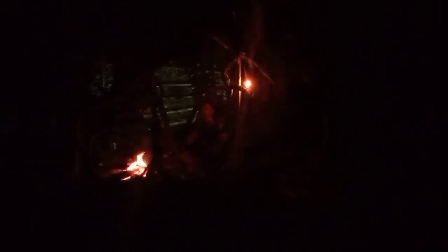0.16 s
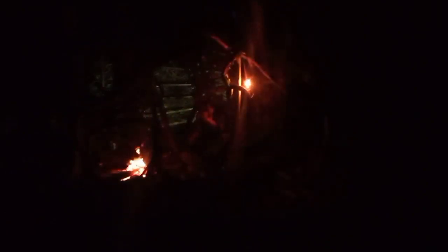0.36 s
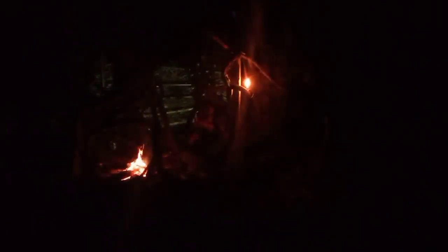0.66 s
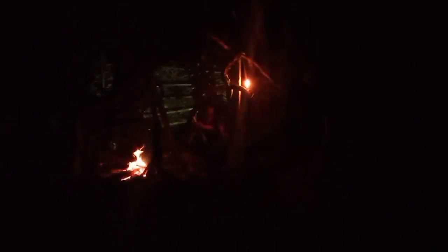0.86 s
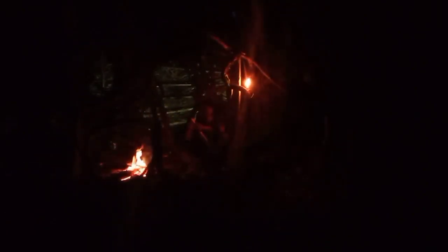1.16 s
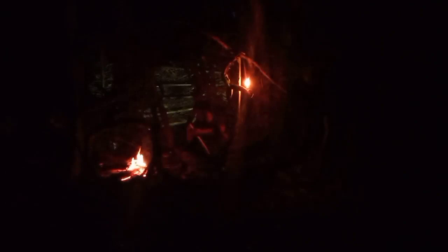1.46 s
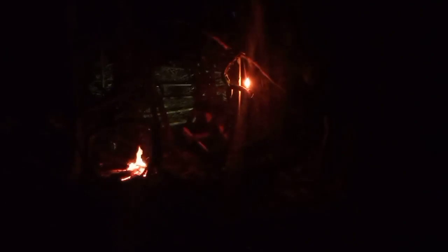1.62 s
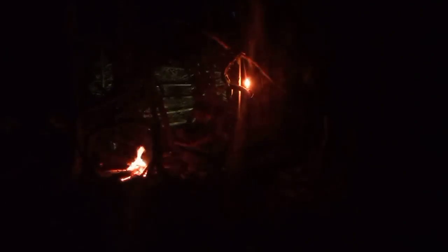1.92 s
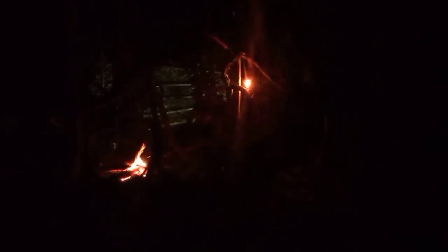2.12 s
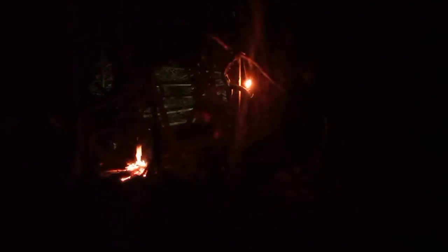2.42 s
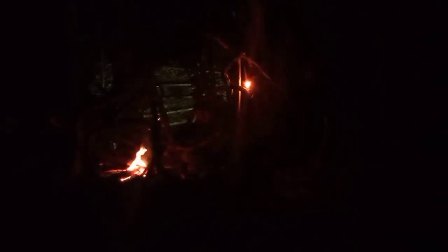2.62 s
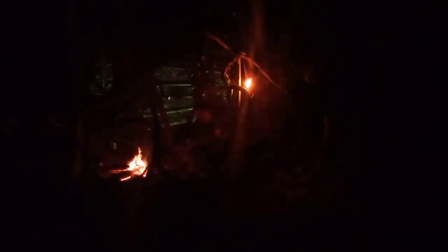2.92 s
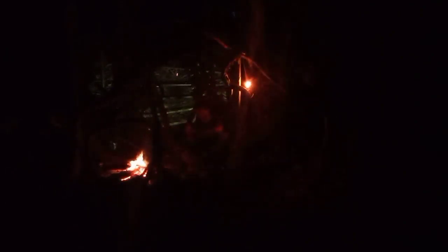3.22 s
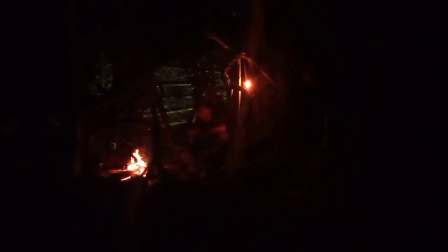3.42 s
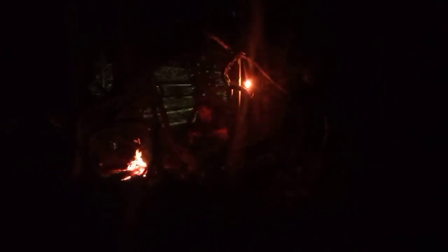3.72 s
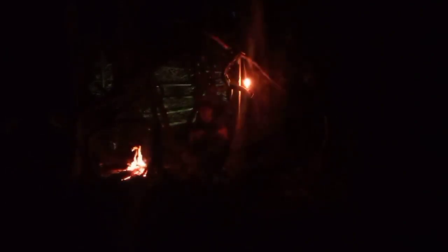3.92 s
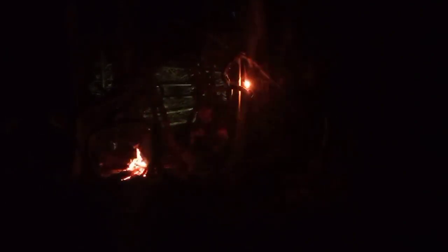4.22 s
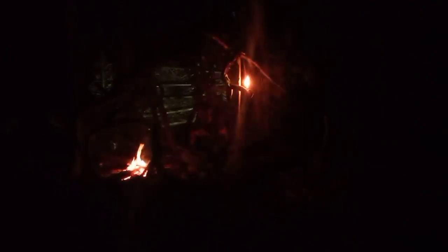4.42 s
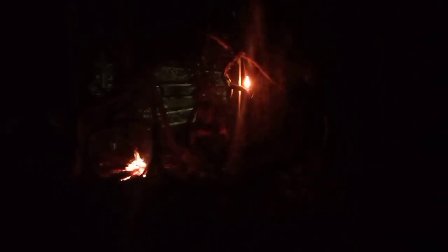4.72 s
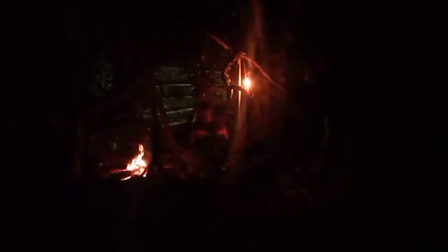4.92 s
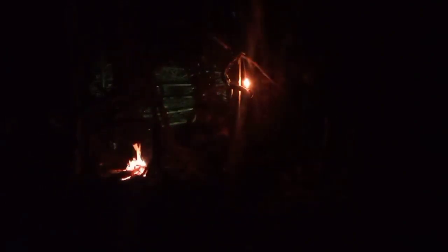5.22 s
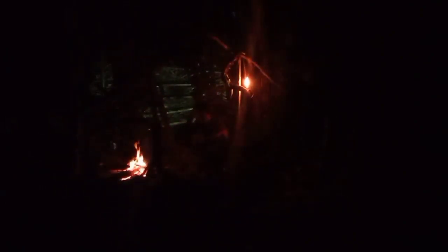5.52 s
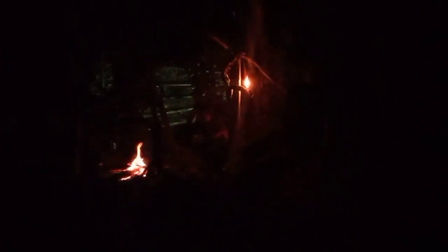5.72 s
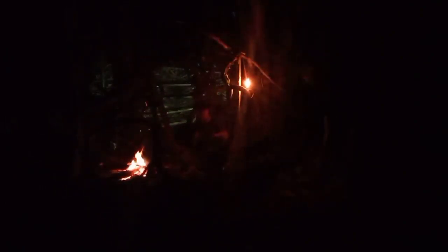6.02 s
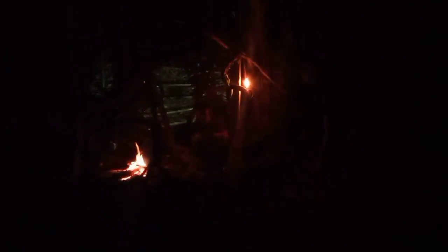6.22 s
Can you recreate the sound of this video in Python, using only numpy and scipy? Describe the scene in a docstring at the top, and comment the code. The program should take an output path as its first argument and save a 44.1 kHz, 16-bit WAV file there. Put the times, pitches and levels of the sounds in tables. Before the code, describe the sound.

A rainforest camp at night, in wide stereo with scattered tree echoes. Cricket choirs trill throughout between 6 and 8 kHz, the lower to the left, the higher to the right, over soft hiss and a distant throbbing chorus. A nearby central cricket gives five-stroke falling chirps about every 0.6 s. From 0 to 2 s the background rises and dips abruptly; katydids rasp very high, mostly left, with a cluster of hard wing snaps at 1.6-1.8 s. At 2.2 s a dense, bright 10-15 kHz buzz swells in quickly; its broader part stops at 4.7 s, the narrower at 6.2 s. Faint frog peeps come around 1.1-1.4, 2.1, 2.5, 4.65, 5.4 and 5.9 s. Dry rustles gather at 3.4-5 s. A small fire flutters and puffs very low, with small cracks at 0.9 and 3.7 s, the sharpest at 4.2-4.3 s left, woodier ones at 4.5 s and a faint one at 5.7 s.

```python
"""Rainforest camp at night

Choirs of crickets trill between 6 and 8 kHz over a far chorus, and one chirps close by: trains of short pure notes.
Katydids rasp very high, mostly on the left, and two other kinds set in with a long buzz, ending one after
the other: clicking file teeth that ring a wing. A small campfire flutters and cracks in shaped noise, a frog
peeps as a wavering tone, something rustles in a spray of ticks, and the trees scatter nearly every sound."""
import sys
import numpy as np
from scipy import signal
from scipy.fft import rfft, irfft, next_fast_len
from scipy.io import wavfile

SR = 44100
rng = np.random.default_rng(int(sys.argv[2]) if len(sys.argv) > 2 else 0)


def to_wav(sig):
    """Store sig (one row per channel, or 1-D mono) as 16-bit WAV at the path in sys.argv[1].

    Samples outside -1..1 are clipped; the rate is SR.
    """
    pcm = np.clip(np.atleast_2d(sig), -1, 1) * 32767
    pcm = np.round(pcm).astype(np.int16)
    wavfile.write(sys.argv[1], SR, pcm.T)  # frames by channels


N = 280476
TIME = np.arange(N) / SR

# In every table and setting, a positive pan_db leans left.
# Levels of the background sounds are those before its common rise and fall.
# common rise and fall of the whole background: start_s, level_db
BACKGROUND_LEVEL = [(0, -8.5), (.78, -8), (.83, -0.5), (.88, 2), (.91, -5.5), (1.06, -6.5), (1.11, 0.5),
                    (1.2, -3.5), (1.3, -1.5), (1.43, -7.5), (1.53, -1), (1.86, 1), (1.91, -4.5),
                    (2.03, -5.5), (2.09, -3.5), (2.16, -7.5), (2.47, -7.5), (2.53, -0.5), (6.13, 0.5),
                    (6.19, -4.5), (6.36, -3.5)]

# single crickets, levels relative within each group: wing_pitch_hz, strokes_per_s, level_db
LOW_SINGERS = [(6030, 65, -12), (6160, 41, -1), (6190, 58, -3), (6225, 47, -2), (6185, 67, -3),
               (6190, 83, 1)]
GUEST_SINGER = [(6045, 40, 0)]
MIDDLE_SINGERS = [(6440, 23, 0.5), (6790, 47, 4), (7040, 74, -6), (7170, 82, -4), (7300, 47, 6)]
HIGH_SINGERS = [(7310, 46, -1), (7524, 51, -3.5), (7630, 57, -4.5), (7744, 36, 1.5), (7865, 69, -0.5),
                (8230, 62, -11)]
TRILLERS = [(7480, 95, 3), (7790, 80, -7.5)]
TREE_SINGERS = [(2290, 41, 1.5), (3070, 52, -10)]

# unbroken wing tones, relative levels: pitch_hz, level_db
LOW_TONES = [(6143, 0), (6262, 0)]
BROAD_TONES = [(10078, -6), (10490, -4), (10648, -1), (10810, -4), (11311, -3), (12345, -1), (12490, -2)]
NARROW_TONES = [(11656, -0.84), (11775, 0.2), (11923, 0.2), (12069, -2.2), (12283, -1)]
LOW_TONES_DB, BROAD_TONES_DB, NARROW_TONES_DB = -7.5, -10, -8.5

LOW_CHOIR_DB, LOW_CHOIR_PAN_DB = -53.5, 4.5
GUEST_MIDDLE_S, GUEST_LENGTH_S, GUEST_DB = 1.24, 0.6, -52.5

# level of the middle choir over time: start_s, level_db
MIDDLE_LEVEL = [(0, -59), (1.1, -68.5), (2.3, -65), (2.65, -53.5), (3.05, -61), (3.6, -59), (4.7, -50.5),
                (5.3, -60), (6.36, -57.5)]
# moments when the middle choir stands out: middle_s, length_s, level_db
MIDDLE_CHIRPS = [(1.36, 0.072, -54.5), (1.616, 0.17, -54), (3.137, 0.063, -55), (3.557, 0.2, -47.5),
                 (3.742, 0.1, -47.5), (4.323, 0.11, -49.5), (4.517, 0.046, -46), (4.81, 0.12, -49),
                 (5.08, 0.12, -51), (5.665, 0.082, -48.5), (5.85, 0.19, -55), (6.36, 0.032, -49)]
MIDDLE_LOW_HZ, MIDDLE_HIGH_HZ = 6550, 7400

# level of the high choir over time: start_s, level_db
HIGH_LEVEL = [(0, -57.5), (1.2, -54.5), (2.35, -56), (2.6, -52.5), (4, -54.5), (4.8, -51), (5.35, -56),
              (5.8, -53), (6.36, -58)]
HIGH_CHOIR_PAN_DB = -5
TRILLER_DB, TRILLER_PAN_DB = -63.5, -8.5

# level of the low chirr over time: start_s, level_db
CHIRR_LEVEL = [(0, -76), (2.4, -76), (2.6, -66), (3.1, -71), (3.58, -62), (3.85, -70), (4.3, -60),
               (4.55, -61), (4.9, -67), (5.4, -70), (5.8, -65), (6.36, -72)]
CHIRR_LOW_HZ, CHIRR_HIGH_HZ = 3450, 4500

# spectra of the air hiss and the far chorus: frequency_hz, relative_level_db (per Hz)
AIR_COLOUR = [(100, -1.5), (180, 7), (400, 4), (1000, 0), (1500, 0), (2000, 1), (3800, 0), (4700, -2),
              (5400, -7.5), (8300, -19), (9200, -18), (15000, 2)]
CHORUS_COLOUR = [(1700, -15), (2100, 1), (2290, 3.5), (2420, 4.5), (2700, 3.5), (2900, 4.5), (3140, 10),
                 (3260, -10), (4000, -35.5)]
AIR_DB, CHORUS_DB = -60, -62
FAR_CALL_LOW_HZ, FAR_CALL_HIGH_HZ = 2150, 3200

# spectra of the flutter and of the deep part of a puff: frequency_hz, relative_level_db (per Hz)
FLAME_COLOUR = [(25, -28), (55, -3.5), (90, 1), (130, -2.5), (180, -14), (350, -28)]
PUFF_COLOUR = [(18, 13), (50, -7), (75, 14), (110, -39)]
FLAME_DB = -71
PUFF_DEPTH_DB = -4.5  # deep part against upper part

# rasps of the high katydids: middle_s, length_s, level_db, pan_db
RASPS = [(0.272, 0.41, -64.5, 15), (.55, .06, -62, 10), (0.829, 0.08, -48.5, 14), (0.998, 0.13, -58.5, 14),
         (1.104, 0.05, -41, 13), (1.183, 0.11, -57.5, 14), (1.278, 0.086, -52.5, 18),
         (1.523, 0.077, -61, 20), (1.648, 0.12, -47, -2), (1.782, 0.17, -45.5, 1), (2.07, 0.07, -47, 4),
         (2.862, 0.077, -42, 13), (3.807, .06, -43, 14), (4.694, .06, -47, 16), (4.784, 0.095, -44, 23),
         (4.855, .04, -47, 20), (5.168, 0.094, -53, 14), (5.354, .07, -55, 15), (5.538, 0.23, -52, 20),
         (5.717, 0.12, -72, 12), (5.997, 0.37, -58, 14), (6.34, 0.19, -54.5, 9)]
# hard wing snaps, peak levels before the low cut: start_s, level_db, pan_db
WING_SNAPS = [(1.616, -36, -8), (1.657, -35, 10), (1.695, -33, -1), (1.719, -25.5, 14), (1.730, -31, 7),
              (1.737, -31, 5), (1.749, -33, -4), (1.783, -25, 12), (1.814, -29.5, 12), (2.853, -32, 9),
              (4.765, -31, 14), (4.778, -32, 14), (5.531, -28, 18)]
# katydid wing resonances: frequency_hz, relative_level_db (per Hz)
RASP_WING = [(9500, -54), (11000, -23), (12000, -14), (13800, -6.5), (14600, -2), (15100, 0), (15500, -8)]
BROAD_WING = [(8700, -60), (9200, -11), (10000, -4), (10550, 1), (10950, -1.5), (11300, -0.5), (11700, 0.5),
              (12350, 3), (12900, -1.5), (14200, -3), (15500, -4)]
NARROW_WING = [(9000, -27), (10000, -16), (10450, -2.5), (10800, -3.5), (11100, -3), (11380, -7),
               (11750, 1), (12050, -2.5), (12300, -4), (12650, -5), (13100, -9.5), (14200, -12.5),
               (15500, -14)]
SIZZLE_DB, SIZZLE_PAN_DB = -62, 19

# chirps of one near cricket, before the offset of each stroke: start_s, level_db
CHIRPS = [(.079, -41), (.698, -44), (1.259, -38), (1.863, -39.5), (2.487, -43.5), (3.078, -36),
          (3.683, -38.5), (4.296, -39), (4.912, -40), (5.494, -45), (6.128, -44)]
# wing strokes of one chirp, in order: level_db
CHIRP_STROKES = [-12.5, -12, -3, -3.5, -3.5]
CHIRP_STEP_S, CHIRP_STROKE_S = .032, .018
CHIRP_TOP_HZ, CHIRP_FALL_HZ, CHIRPER_PAN_DB = 8060, 700, 1

# rustles in the litter: middle_s, length_s, level_db, crispness (0-1)
RUSTLES = [(0.491, 0.087, -67, 0.8), (2.62, 0.2, -60, .9), (3.45, 0.16, -62, 0.8),
           (3.595, 0.075, -57.5, 0.72), (3.93, 0.55, -62, 0.4), (4.32, 0.18, -56, 0.6),
           (4.514, 0.068, -55, 0.55), (4.723, 0.2, -57, 0.6), (5.01, 0.29, -59.5, 0.5),
           (5.814, 0.12, -61, 0.8)]
# spectrum of the litter ticks: frequency_hz, relative_level_db (per Hz)
RUSTLE_COLOUR = [(600, -5), (1100, 1), (1500, 9), (2100, 5), (3200, 3), (4100, 5), (5200, -6), (7000, -10),
                 (10000, -10)]
RUSTLE_SPLIT_HZ = 2950

# puffs of the flames: middle_s, length_s, level_db, pan_db
PUFFS = [(.6, 0.044, -74, -5), (0.845, 0.028, -63.5, 4), (0.99, 0.089, -67, 8), (1.314, 0.065, -68, 3),
         (1.438, 0.12, -67.5, 1), (1.87, 0.13, -67.5, -6), (2.212, 0.057, -74.5, -7),
         (2.438, 0.1, -66.5, -17), (2.544, 0.051, -61.5, -19), (2.724, 0.03, -61, -17),
         (2.816, 0.027, -63, -17), (3.022, 0.023, -56.5, -17), (3.282, 0.04, -63.5, 1),
         (3.674, 0.11, -63, 1), (3.844, 0.1, -63.5, 21), (4.108, 0.062, -66, 2), (4.221, 0.032, -61.5, -10),
         (4.821, 0.04, -67.5, -1), (4.97, 0.14, -62, 10), (5.175, 0.069, -64, 1),
         (5.566, 0.042, -65.5, -10), (5.695, 0.091, -68, 0)]
# cracks of the wood, before the fire's mix: start_s, level_db, ring_hz, ring_t60_s, pan_db
CRACKS = [(0.884, -52, 6500, 0.01, 5), (3.708, -50.5, 1760, 0.019, -1), (4.214, -42, 12400, .008, 16),
          (4.286, -30, 12500, .015, 20), (4.336, -53, 1510, 0.1, 8), (4.503, -51, 3930, 0.06, 10),
          (4.521, -46.5, 3880, 0.08, 9), (5.698, -58, 7000, 0.024, 4)]
TICK_DB = -8  # sharp tick against the ring

# frog peeps: middle_s, level_db, pan_db
PEEPS = [(1.115, -67, 3), (1.28, -65, 9), (1.36, -67, -1), (2.095, -60, 7), (2.53, -63, 9), (4.65, -56, 18),
         (5.42, -55.5, 11), (5.89, -56, 0)]
PEEP_HZ = 2283

# both kinds of the long buzz set in together and end one after the other
BUZZ_START_S, BROAD_END_S, NARROW_END_S = 2.175, 4.73, 6.21
BROAD_ATTACK_S, BROAD_RELEASE_S, BROAD_DB, BROAD_PAN_DB = 0.22, 0.2, -40.5, 0.5
NARROW_ATTACK_S, NARROW_RELEASE_S, NARROW_DB, NARROW_PAN_DB = 2.56, 0.26, -43.5, 2
# it spreads out from its core as it starts and shrinks back as it stops
BUZZ_CORE_HZ, BUZZ_WIDENS_S, BUZZ_NARROWS_S = 11600, 0.53, 0.15

# pips of another cricket: middle_s, pitch_hz, level_db
PIPS = [(2.216, 6600, -50), (2.68, 6730, -46), (2.93, 6500, -60), (3.55, 6740, -56), (4.2, 6740, -58),
        (4.41, 6750, -50), (4.63, 6680, -54), (4.85, 6860, -54), (5.3, 6740, -54), (5.49, 6770, -52),
        (6.13, 6720, -45)]
PIP_LENGTH_S = 0.045

CUTOFF_HZ = 15450


def from_db(db):
    """Decibels to gain."""
    return 10 ** (np.asarray(db) / 20)


def rms_one(x):
    """Scale to unit rms, each channel alone."""
    return x / np.sqrt(np.mean(x ** 2, axis=-1, keepdims=True) + 1e-20)


def in_time(rows):
    """The columns of a curve at every sample."""
    s, *columns = np.transpose(rows)
    return [np.interp(TIME, s, c) for c in columns]


def drift(rate):
    """Slow random wandering of rms 1, mostly below the rate in Hz."""
    step = 40  # samples between the points of the slow curve
    hz = np.fft.rfftfreq(N // step, step / SR)
    slow = irfft(rfft(rng.standard_normal(N // step)) / (1 + (hz / rate) ** 2))
    return np.interp(np.arange(N) / step, np.arange(len(slow)), rms_one(slow))


def sway(rate, depth_db):
    """Gains of many unrelated singers coming and going, different in each ear."""
    return from_db(depth_db * np.array([drift(rate), drift(rate)]))


def swell(s, length):
    """A flat-topped hump around s, 6 dB down at the ends of its length."""
    return 1 / (1 + np.square(np.square(2 * (TIME - s) / length)))


def panned(pan_db):
    """Left and right gains of constant total power."""
    gains = from_db(np.array([[.5], [-.5]]) * pan_db)
    return gains / np.sqrt(np.mean(gains ** 2, axis=0))


def colour(x, points):
    """Give a steady sound a spectrum that falls 60 dB per octave beyond its ends; rms 1."""
    size = next_fast_len(N, real=True)
    octave = np.log2(np.fft.rfftfreq(size, 1 / SR) + 1)
    hz, db = np.transpose(points)
    knots = np.log2(hz)
    beyond = np.abs(octave - np.clip(octave, knots[0], knots[-1]))
    gain = from_db(np.interp(octave, knots, db) - 60 * beyond)
    return rms_one(irfft(rfft(x, size) * gain, size)[..., :N])


def diffuse(points, alike):
    """Stereo noise from all round, partly alike in both ears."""
    mid, side = rng.standard_normal((2, N))
    alike = np.clip(alike, 0, 1)
    both = np.sqrt(1 + alike) * mid + np.sqrt(1 - alike) * side * [[1], [-1]]
    return colour(both, points)


def forest(x, t60, direct_db):
    """The straight path plus countless small echoes from trunks and leaves, unrelated in the two ears."""
    t = TIME[:SR // 2]
    echoes = rng.standard_normal((2, len(t))) * from_db(-60 * t / t60)
    paths = rms_one(echoes) / np.sqrt(len(t))
    # the straight path reaches each ear within the first 16 samples
    paths[[0, 1], rng.integers(0, 16, size=2)] += from_db(direct_db)
    paths = paths / np.sqrt(1 + from_db(direct_db) ** 2)
    return signal.oaconvolve(x[None], paths, axes=1)[:, :N]


def stroke_phase(per_s, unsteady):
    """Place within the wing stroke, 0-1, at a slightly unsteady rate."""
    return (rng.random() + np.cumsum(per_s * (1 + unsteady * drift(3))) / SR) % 1


def crickets(singers, glide, waver, throb_db, t60, direct_db):
    """Each wing stroke is a short pure note, begun afresh, that sags in pitch as the file slows."""
    out = 0
    for hz, per_s, db in singers:
        phase = stroke_phase(per_s, unsteady=.09)
        stroke_number = np.cumsum(np.diff(phase, prepend=0) < 0)
        fresh = rng.random(2000)[stroke_number]  # a new starting phase for each stroke
        pitch = hz * (1 + glide * (.5 - phase) + waver * drift(222.5))
        tone = np.sin(2 * np.pi * (np.cumsum(pitch) / SR + fresh))
        note = np.sin(np.pi * phase) ** 4 * tone
        throbbing = note * from_db(throb_db * drift(25.5))
        out = out + from_db(db) * rms_one(forest(throbbing, t60, direct_db))
    return rms_one(out)


def whistles(tones, waver_hz, throb_db):
    """Singers whose wings ring on without a break: thin, wavering tones among the trees."""
    voices = 0
    for hz, db in tones:
        gain = from_db(db + throb_db * drift(3.1))
        voices = voices + gain * np.sin(2 * np.pi * np.cumsum(hz + waver_hz * drift(28.7)) / SR)
    return rms_one(forest(voices, t60=0.18, direct_db=3.5))


def far_calls(low_hz, high_hz, per_s, length_s, spread_db, t60, direct_db):
    """Countless distant callers, each one short note at a pitch of its own; rms 1."""
    t = np.arange(int(length_s * SR)) / SR
    out = np.zeros(N + SR)
    for when, height, size in rng.random((int(per_s * N / SR), 3)):
        at = int(when * N)
        hz = low_hz + height * (high_hz - low_hz)
        out[at:at + len(t)] += from_db(spread_db * size) * np.hanning(len(t)) * np.sin(2 * np.pi * hz * t)
    return rms_one(forest(out[:N], t60, direct_db))


def katydids(wing, strokes_per_s, teeth_per_s, stroke_db, tooth_db, t60, direct_db, haze_db, count):
    """File teeth click into a wing resonance in quick strokes; near singers echo, far ones blur to haze."""
    near = 0
    for _ in range(count):
        stroke = from_db(stroke_db * np.cos(2 * np.pi * stroke_phase(strokes_per_s, unsteady=0.029)))
        sizes = from_db(tooth_db * np.clip(rng.standard_normal(N), -2, 2)) * rng.choice([-1, 1], N)
        teeth = (rng.random(N) < teeth_per_s / SR) * sizes
        near = near + forest(teeth * stroke, t60, direct_db)
    haze = from_db(haze_db) * rng.standard_normal((2, N))
    return colour(rms_one(near) + haze, wing)


def burst(s, hz, octaves, t60):
    """A sharp burst of band noise that dies at once; peak 1."""
    t = TIME[:SR // 8]
    edges = np.clip([hz * 2 ** (-octaves / 2), hz * 2 ** (octaves / 2)], 20, .45 * SR)
    band = signal.butter(2, edges, "band", fs=SR, output="sos")
    hit = signal.sosfilt(band, rng.standard_normal(len(t)) * from_db(-60 * t / t60))
    return np.pad(hit / np.abs(hit).max(), (round(s * SR), N))[:N]


def low_choir():
    """A steady trill on the left with two thin tones in it, which one lower voice joins briefly."""
    choir = crickets(LOW_SINGERS, glide=.006, waver=.002, throb_db=1.2, t60=.25, direct_db=4)
    choir = choir + from_db(LOW_TONES_DB) * whistles(LOW_TONES, waver_hz=9.04, throb_db=4.0)
    choir = from_db(LOW_CHOIR_DB) * sway(rate=7, depth_db=2.0) * choir
    guest = crickets(GUEST_SINGER, glide=0.0056, waver=0.0022, throb_db=2.5, t60=0.26, direct_db=-4)
    guest = from_db(GUEST_DB) * swell(GUEST_MIDDLE_S, GUEST_LENGTH_S) * guest
    return (choir + guest) * panned(LOW_CHOIR_PAN_DB)


def middle_choir():
    """Far crickets all round, with single notes, and chirps that stand out now and then."""
    level_db, = in_time(MIDDLE_LEVEL)
    chirps = sum(from_db(db) * swell(s, length) for s, length, db in MIDDLE_CHIRPS)
    choir = crickets(MIDDLE_SINGERS, glide=.07, waver=.012, throb_db=2, t60=.12, direct_db=-4)
    notes = far_calls(MIDDLE_LOW_HZ, MIDDLE_HIGH_HZ, per_s=200, length_s=.028, spread_db=8,
                      t60=.08, direct_db=-4)
    return np.hypot(from_db(level_db), chirps) * rms_one(choir + notes)


def high_choir():
    """A choir and two clear trillers on the right, with fast wing strokes."""
    level_db, = in_time(HIGH_LEVEL)
    choir = crickets(HIGH_SINGERS, glide=.045, waver=.006, throb_db=2, t60=.1, direct_db=-2)
    choir = from_db(level_db) * panned(HIGH_CHOIR_PAN_DB) * sway(rate=10, depth_db=2.5) * choir
    trillers = crickets(TRILLERS, glide=0.006, waver=0.003, throb_db=2, t60=0.15, direct_db=3)
    trillers = from_db(TRILLER_DB + 2 * drift(4.1)) * panned(TRILLER_PAN_DB) * trillers
    return choir + trillers


def low_chirr():
    """Distant lower insects overlap in a soft, faintly pitched wash."""
    level_db, = in_time(CHIRR_LEVEL)
    notes = far_calls(CHIRR_LOW_HZ, CHIRR_HIGH_HZ, per_s=260, length_s=.024, spread_db=8,
                      t60=.12, direct_db=0)
    return from_db(level_db) * notes * panned(2.3)


def far_forest():
    """A soft hiss, and a distant chorus: a throbbing blur with single notes and two tree crickets."""
    air = from_db(AIR_DB) * diffuse(AIR_COLOUR, alike=0.078) * panned(-0.76)
    blur = from_db(-1.5 + 2.8 * drift(12)) * diffuse(CHORUS_COLOUR, alike=0.016)
    notes = far_calls(FAR_CALL_LOW_HZ, FAR_CALL_HIGH_HZ, per_s=130, length_s=.02, spread_db=10,
                      t60=.22, direct_db=0)
    trills = crickets(TREE_SINGERS, glide=0.0079, waver=0.00817, throb_db=0.0, t60=0.24, direct_db=-5.5)
    chorus = blur + from_db(-5.5) * notes + from_db(-9.5) * trills
    return air + from_db(CHORUS_DB) * chorus * panned(1.5)


def flames():
    """The flames flutter steadily in the bass: low noise of wavering level."""
    flutter = from_db(FLAME_DB + 1.0 * drift(15)) * sway(rate=3.7, depth_db=2.0)
    return flutter * diffuse(FLAME_COLOUR, alike=0.54)


def phrase(s, length):
    """A rasp centred on s that swells and fades briskly, 6 dB down at the ends of its length."""
    return 1 / (1 + np.square(2 * (TIME - s) / length) ** 3)


def high_katydids():
    """Short, very high rasps over a faint sizzle that follows the background, with hard wing snaps."""
    phrases = sum(from_db(db) * phrase(s, length) * panned(pan) for s, length, db, pan in RASPS)
    background_db, = in_time(BACKGROUND_LEVEL)
    sizzle = from_db(SIZZLE_DB + background_db) * panned(SIZZLE_PAN_DB)
    rasp = katydids(RASP_WING, strokes_per_s=48, teeth_per_s=900, stroke_db=2, tooth_db=2.5,
                    t60=.04, direct_db=0, haze_db=-8, count=2)
    snaps = sum(from_db(db) * panned(pan) * burst(s, 15000, octaves=.12, t60=.045)
                for s, db, pan in WING_SNAPS)
    # the tiny wing radiates almost nothing below its resonance
    snaps = signal.sosfilt(signal.butter(4, 13000, "high", fs=SR, output="sos"), snaps)
    return np.hypot(phrases, sizzle) * rasp + snaps


def chirper():
    """Five wing strokes, the first two softer, each a quick downward sweep from its own pitch."""
    t = np.arange(int(CHIRP_STROKE_S * SR)) / SR
    pitch = CHIRP_TOP_HZ - CHIRP_FALL_HZ * t / CHIRP_STROKE_S
    hump = np.sin(np.pi * t / CHIRP_STROKE_S) ** 2
    out = np.zeros(N + SR)
    for s, db in CHIRPS:
        for k, stroke_db in enumerate(CHIRP_STROKES):
            at = int((s + k * CHIRP_STEP_S) * SR)
            stroke = hump * np.sin(2 * np.pi * np.cumsum(pitch + rng.normal(0, 56)) / SR)
            out[at:at + len(t)] += from_db(db + stroke_db + rng.normal(0, 1)) * stroke
    return forest(out[:N], t60=.09, direct_db=-1) * panned(CHIRPER_PAN_DB)


def rustles():
    """Soft rustles in dry litter: a dense spray of tiny ticks, crisp from thin leaves or dull from twigs."""
    sizes = rng.choice([-1, 1], N) * from_db(5 * np.clip(rng.standard_normal(N), -2, 2))
    ticks = (rng.random(N) < 1200 / SR) * sizes  # 1200 ticks per second
    spray = colour(forest(ticks, t60=0.12, direct_db=-8), RUSTLE_COLOUR) * panned(1.0)
    dull = signal.sosfilt(signal.butter(3, RUSTLE_SPLIT_HZ, "low", fs=SR, output="sos"), spray)
    crisp = signal.sosfilt(signal.butter(3, RUSTLE_SPLIT_HZ, "high", fs=SR, output="sos"), spray)
    out = 0
    for s, length, db, crispness in RUSTLES:
        litter = rms_one(crispness * crisp + (1 - crispness) * dull)
        out = out + from_db(db) * swell(s, length) * litter
    return out


def campfire():
    """Flames puff, with a deeper part than their flutter; wood cracks as a sharp tick and a short ring."""
    surge = sum(from_db(db) * swell(s, length) * panned(pan) for s, length, db, pan in PUFFS)
    deep = from_db(PUFF_DEPTH_DB) * diffuse(PUFF_COLOUR, alike=0.07)
    puffs = surge * (diffuse(FLAME_COLOUR, alike=0.87) + deep)
    cracks = 0
    for s, db, hz, t60, pan in CRACKS:
        ring = burst(s, hz, octaves=0.55, t60=t60)
        tick = from_db(TICK_DB) * burst(s, hz, octaves=3.2, t60=.006)
        cracks = cracks + from_db(db) * panned(pan) * (ring + tick)
    echoes = forest(cracks.mean(axis=0), t60=0.14, direct_db=-38)
    return puffs + from_db(-0.5) * cracks + from_db(6.0) * echoes


def frog():
    """Short, nearly pure peeps from among the trees, slightly rough from a quick pitch waver."""
    voice = np.sin(2 * np.pi * np.cumsum(PEEP_HZ * (1 + 0.015 * drift(136.7))) / SR)
    calls = sum(from_db(db) * panned(pan) * swell(s, length=0.042) for s, db, pan in PEEPS)
    return calls * rms_one(forest(voice, t60=0.44, direct_db=26))


def held(attack, end, release):
    """A buzz swells in, holds, and fades out."""
    return np.clip((TIME - BUZZ_START_S) / attack, 0, 1) * np.clip((end - TIME) / release, 0, 1)


def ragged(buzz, effort, skirt, patchy_db):
    """Soft strokes ring only the middle of the wing's range; each part of the range wavers by itself."""
    size = next_fast_len(N, real=True)
    spectrum, hz = rfft(buzz, size), np.fft.rfftfreq(size, 1 / SR)
    centres = np.linspace(9300, 15300, 7)
    out = 0
    for centre in centres:
        part = irfft(spectrum * np.interp(hz, centres, centres == centre), size)[:, :N]
        # the further from the core, the more closely a part follows the effort
        edge = effort ** abs(skirt * np.log2(centre / BUZZ_CORE_HZ))
        out = out + part * edge * from_db(patchy_db * drift(6.1))
    return out


def long_buzz():
    """Two kinds of katydid buzz with a few ringing tones; the broader voices swell in and stop first."""
    broad = katydids(BROAD_WING, strokes_per_s=32, teeth_per_s=1100, stroke_db=1.8, tooth_db=3,
                     t60=0.07, direct_db=-3, haze_db=-12, count=3)
    broad = broad + from_db(BROAD_TONES_DB) * whistles(BROAD_TONES, waver_hz=19.7, throb_db=1.5)
    broad = from_db(BROAD_DB) * panned(BROAD_PAN_DB) * broad
    broad = broad * held(BROAD_ATTACK_S, BROAD_END_S, BROAD_RELEASE_S)

    narrow = katydids(NARROW_WING, strokes_per_s=28, teeth_per_s=950, stroke_db=3.0, tooth_db=3.0,
                      t60=0.1, direct_db=-8, haze_db=-10, count=3)
    narrow = narrow + from_db(NARROW_TONES_DB) * whistles(NARROW_TONES, waver_hz=16.2, throb_db=7)
    narrow = from_db(NARROW_DB) * panned(NARROW_PAN_DB) * sway(rate=11, depth_db=1.2) * narrow
    narrow = narrow * held(NARROW_ATTACK_S, NARROW_END_S, NARROW_RELEASE_S)

    effort = held(BUZZ_WIDENS_S, NARROW_END_S, BUZZ_NARROWS_S)
    return ragged(broad + narrow, effort, skirt=2.2, patchy_db=.8)


def pips():
    """One cricket gives short, nearly pure pips between the two choirs."""
    s, hz, db = np.transpose(PIPS)
    pitch = np.interp(TIME, s, hz) + 55 * drift(120)
    voice = np.sin(2 * np.pi * np.cumsum(pitch) / SR)
    calls = sum(from_db(level_db) * swell(at, PIP_LENGTH_S) for at, level_db in zip(s, db))
    return forest(calls * voice, t60=0.17, direct_db=-8)


def scene():
    """Everything heard from the camp; the background sounds rise and sink together."""
    background_db, = in_time(BACKGROUND_LEVEL)
    choirs = low_choir() + middle_choir() + high_choir()
    distance = low_chirr() + far_forest()
    background = choirs + distance + flames() + chirper() + long_buzz() + pips()
    return from_db(background_db) * background + high_katydids() + rustles() + campfire() + frog()


def record(dry):
    """A steep low-pass cuts the top."""
    return signal.sosfilt(signal.ellip(12, .1, 80, CUTOFF_HZ, fs=SR, output="sos"), dry)


dry = scene()
out = record(dry)
to_wav(out)
```